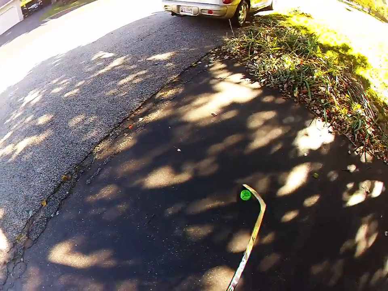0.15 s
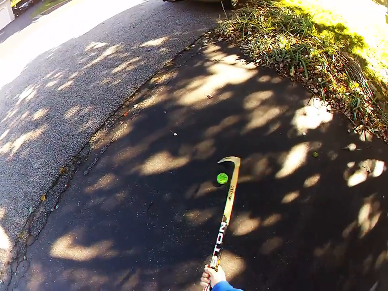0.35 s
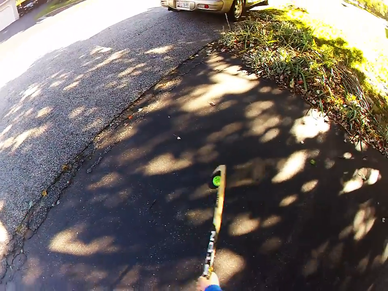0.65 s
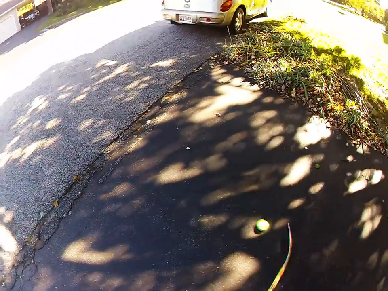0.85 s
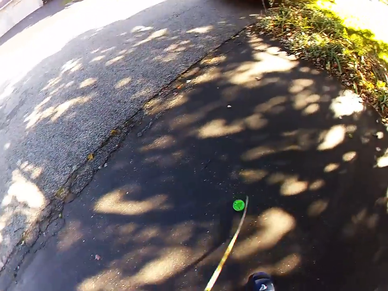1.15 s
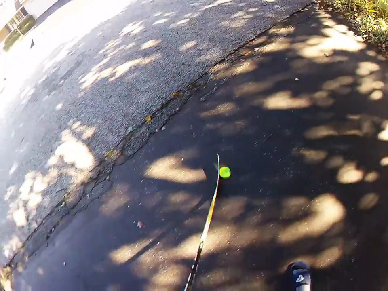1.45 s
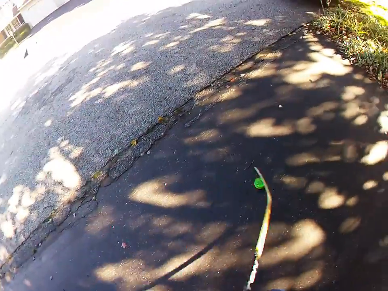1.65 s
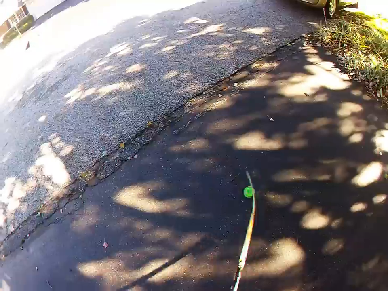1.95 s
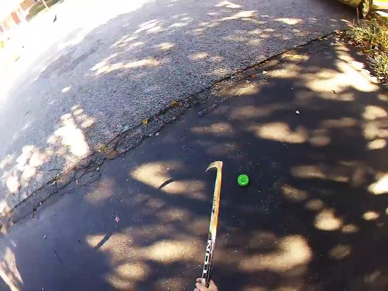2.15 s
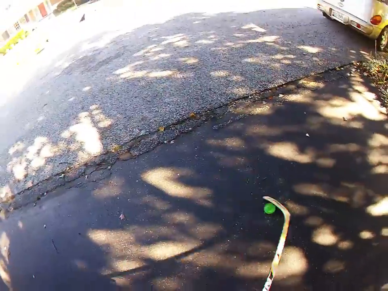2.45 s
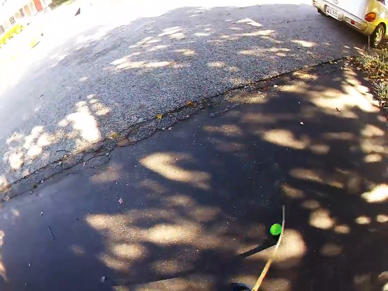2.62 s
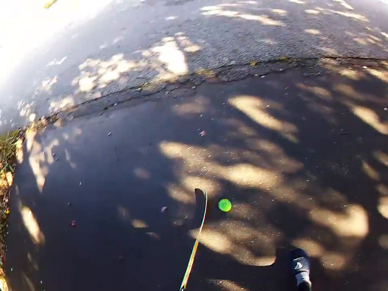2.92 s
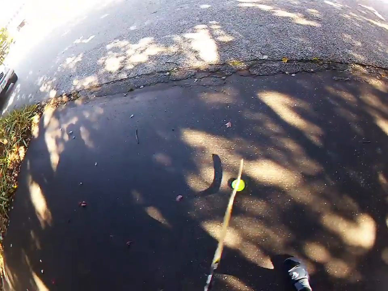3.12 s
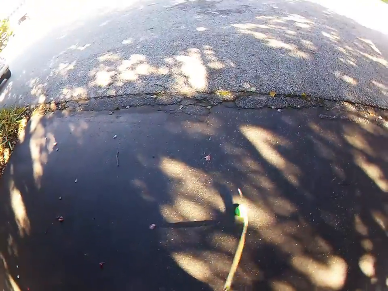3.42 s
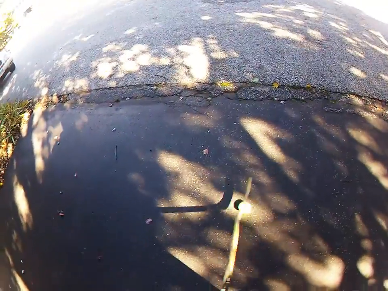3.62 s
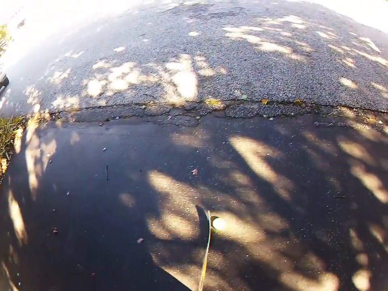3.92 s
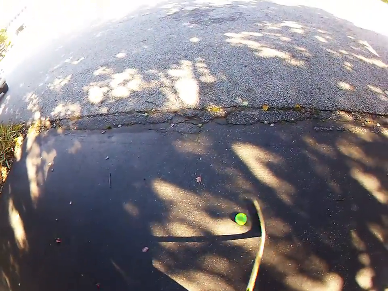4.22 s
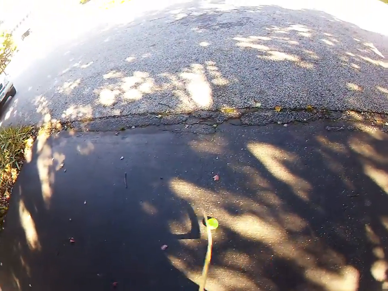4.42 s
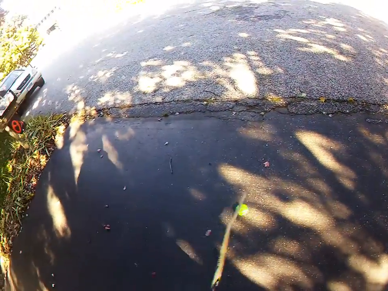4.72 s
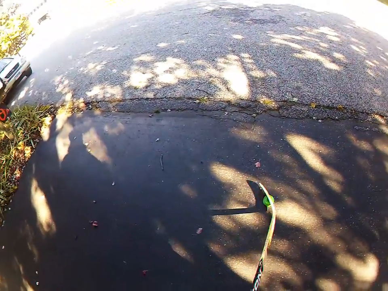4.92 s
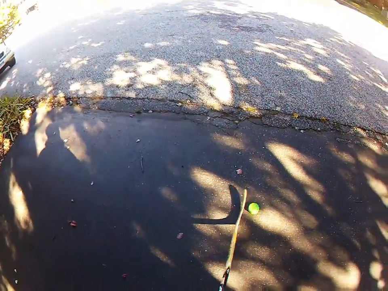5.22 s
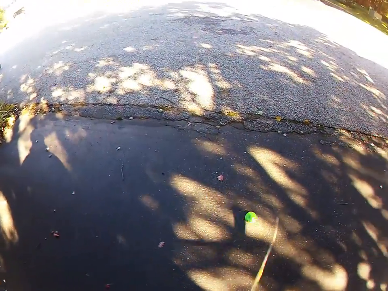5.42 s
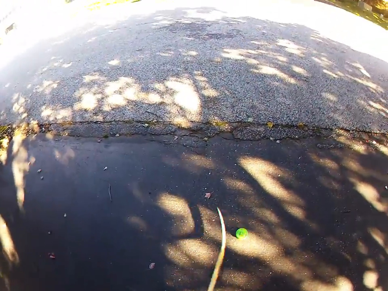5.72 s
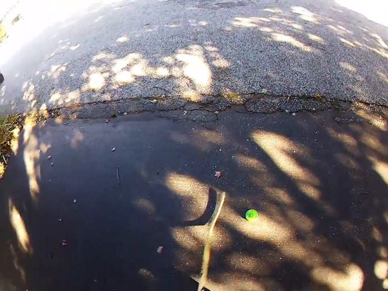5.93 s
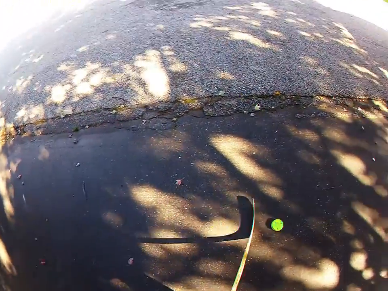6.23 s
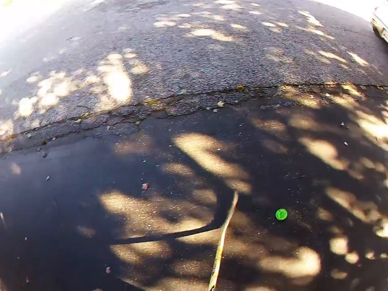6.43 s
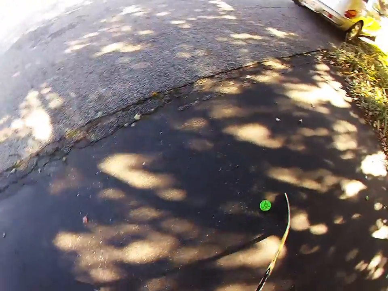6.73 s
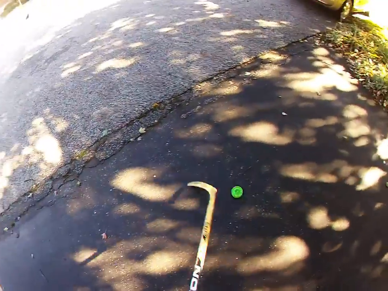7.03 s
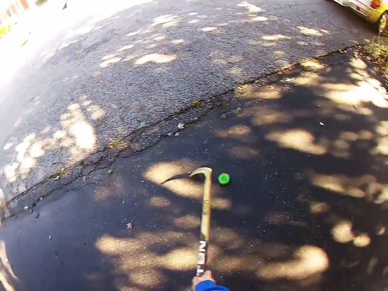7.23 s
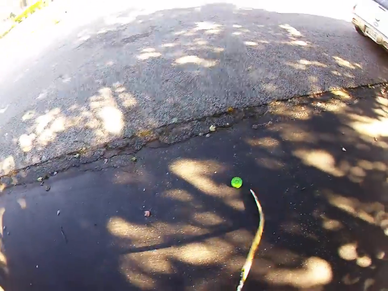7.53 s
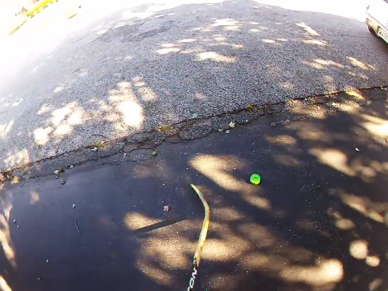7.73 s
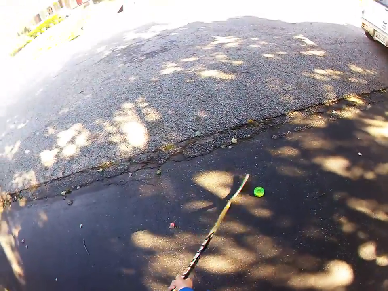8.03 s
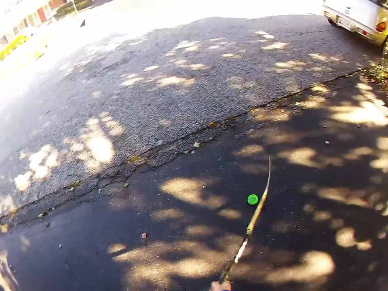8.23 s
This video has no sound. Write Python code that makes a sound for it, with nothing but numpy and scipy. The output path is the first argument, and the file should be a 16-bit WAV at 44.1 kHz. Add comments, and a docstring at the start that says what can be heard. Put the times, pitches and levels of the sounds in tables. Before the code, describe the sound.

A stick blade taps a loose plastic puck on asphalt, close and dry, in mono from a small head-worn camera. A hard clack with gritty scraping opens at 0 s, with smaller knocks to 0.4. Clicks return at 0.64, grow strong at 0.8 and 1.0, then cluster from 1.35 to 1.8. After a quieter gap, taps and rasping slides resume at 2.35 to 2.6. From 2.8 to 4.7 come irregular clacks, some hollow, strongest near 4.0 and 4.36. Sparser knocks follow at 4.97, 5.35, 5.75 and 5.95, then sharp ones at 6.1 and 6.63. The busiest, brightest burst with loud scraping runs 6.8 to 7.45, peaking at 7.39. It thins out, with small taps near 8.1. Low wind bumps, notably at 3.65, faint street hum and dull footfalls near 0.5, 1.45, 2.5, 3.1, 3.7, 7.3 and 8.1 sit beneath.

```python
"""A hockey stick blade taps and slides a loose plastic puck over asphalt, at a small head-worn camera.
From the start, gritty sliding and blows ring shared blade-and-puck modes, over gusty low wind noise
and steady street hum; from 0.5 s on, a few footfalls add short dull puffs of band-passed noise.
The camera takes 12000 samples a second and holds each one: tones get mirror images in the treble."""
import sys
import numpy as np
from scipy import signal
from scipy.fft import rfft, irfft
from scipy.io import wavfile
from scipy.ndimage import uniform_filter1d

SR = 44100
rng = np.random.default_rng(int(sys.argv[2]) if len(sys.argv) > 2 else 0)


def dump_mix(stems):
    """Bounce the given channels to the path in sys.argv[1] as a 16-bit WAV at rate SR."""
    frames = np.atleast_2d(stems).T  # one column per channel
    limited = np.clip(frames, -1, 1)  # hard clip at full scale
    pcm = np.round(limited * 32767).astype(np.int16)
    wavfile.write(sys.argv[1], SR, pcm)


N = 368676

# nominal modes of blade and puck together: [f/Hz, level/dB, free t60/s]
MODES = [(691, -23, 0.092), (931, -8, 0.07), (1261, -14, 0.057), (1685, -22.5, 0.1), (2180, -14, 0.09),
         (2222, -3.5, 0.025), (2511, 0.5, 0.029), (2740, -3.5, 0.027), (2914, -20.5, 0.046),
         (3403, -3.5, 0.019), (3720, -6.5, 0.021), (4170, -31, 0.055), (4650, -41, 0.023),
         (5320, -11, 0.044), (5287, -5, 0.024)]
# scrape after each push of the blade, dying as the puck slows:
# [start/s, rise/s, level/dB, fade/(dB/s), hollow part/dB, lower ring/dB, bright part/dB]
PUSHES = [(0.0, 0.0045, -46.5, 250, -8, -12, -5), (0.09, 0.027, -63, 50, -16, 6, -12),
          (0.32, .06, -68, 170, 2, 9, -6), (0.639, 0.0065, -68, 57, -1, -4, -14),
          (0.7, 0.078, -52, 3, -25, -13, -6), (0.815, 0.0056, -44.5, 45, -13, -2, 2),
          (1.0, 0.029, -47, 97, -15, -19, -7), (1.383, 0.013, -50, 159, 1, 16, -20),
          (1.506, 0.0061, -50.5, 105, -9, 8, -32), (1.713, 0.03, -49.5, 215, -26, -25, -2),
          (1.79, 0.032, -53.5, 250, -1.5, 14, -5), (1.92, 0.043, -65.5, 70, -2, 1, 2),
          (2.354, 0.066, -53.5, 8, -8, 10, 0), (2.47, .045, -51, 55, -16, -23, 6.5),
          (2.597, .007, -49, 77, -6, -2, -12), (2.85, 0.055, -61, 20, -28.5, -16, -6),
          (2.975, .008, -62, 3, -3, 8, -12), (3.08, 0.009, -49, 121, -30, 10, -1.5),
          (3.325, 0.0092, -50.5, 127, -25, -12, -12), (3.6, .008, -63, 3, -12, 10, -11),
          (3.663, 0.0096, -49.5, 144, -12, -12, -6), (3.807, 0.0079, -49, 140, -3, 20, -14),
          (4.011, 0.008, -46.5, 106, -17, -9, -28), (4.254, .008, -62, 40, 6, 17, -18),
          (4.339, 0.019, -51.5, 5, -19, 1, -5), (4.365, 0.031, -50.5, 114, -34, -20, -24),
          (4.668, 0.0059, -50.5, 203, -32, -5, -5), (4.77, 0.083, -64, 88, -18, -12, 1.5),
          (4.973, 0.0074, -61, 137, -16, -9, -10), (5.354, .008, -54.5, 121, -26, 4, -7),
          (5.445, 0.039, -58, 71, 10.5, 30, -33), (5.746, .008, -54.5, 91, 2.5, 22, -31),
          (5.95, .008, -61.5, 68, 2, 15, -25), (6.097, .009, -49.5, 121, -22, -22, 0),
          (6.25, 0.043, -59, 65, -21, -10, -17), (6.54, .04, -68, 60, -12, -6, -10),
          (6.624, 0.0087, -57, 77, -12, -1, 0), (6.805, 0.0077, -42, 333, -3.5, 8, -17),
          (6.87, 0.082, -45, 208, -15, -13, -13), (7.03, 0.044, -58.5, 49, -10, -10, -12),
          (7.31, 0.11, -44, 6, -13, -16, 3), (7.385, 0.055, -44, 221, -16, -22, 2),
          (7.557, .012, -56, 5, -23, -12, 8), (7.6, 0.024, -45.5, 110, -3, 5, -5),
          (7.71, 0.021, -74, 113, 3, 23, -15), (7.95, 0.033, -71, 5, -4, 14, -8),
          (8.04, 0.075, -61, 5, 6, 11, 4), (8.103, 0.0091, -50, 30, -18, 13, -10),
          (8.17, 0.0065, -51.5, 99, -11, -3, -14)]


def gain_of(db):
    """Decibels to an amplitude factor."""
    return 10 ** (np.asarray(db) / 20)


def evened(x):
    """Scaled to rms 1."""
    return x / np.sqrt(np.mean(x ** 2) + 1e-20)


def colour_db(hz, borders_hz, hollow_db, lower_db, bright_db, top_db):
    """Weight of a mode: the place of contact favours the low, middle or high modes."""
    weights_db = [hollow_db, lower_db, 0, bright_db, top_db]
    return weights_db[np.searchsorted(borders_hz, hz)]


def ring(force, hz, t60_s):
    """One decaying mode driven by a force: two-pole resonator with zeros at DC and Nyquist."""
    r = 1000 ** (-1 / (t60_s * SR))
    poles = [1, -2 * r * np.cos(2 * np.pi * hz / SR), r * r]
    return signal.lfilter([1, 0, -1], poles, force)


def coloured(points):
    """Steady rms-1 noise, spectrum through points [f/Hz, relative level/dB]."""
    f_hz, db = np.transpose(points)
    hz = np.fft.rfftfreq(N, 1 / SR)
    shape_db = np.interp(np.log(hz + 1), np.log(f_hz + 1), db)
    return evened(irfft(rfft(rng.standard_normal(N)) * gain_of(shape_db), N))


def scrape_levels(t_s):
    """Level of every scrape over time: it swells, fades evenly in dB and gives way to the next."""
    start_s, rise_s, db, fade_db_per_s = np.transpose(PUSHES)[:4, :, None]
    since_s = t_s - start_s
    swell = np.clip(since_s / rise_s, 0, 1) ** 1.13
    handover = 1 - np.append(swell[1:], 0 * swell[:1], axis=0)
    fading_db = db - fade_db_per_s * np.maximum(since_s - rise_s, 0)
    return swell * handover * gain_of(fading_db)


def grit_force():
    """Asphalt grit knocks the puck in dense clumps, over a fine hiss of rubbing."""
    lumps = uniform_filter1d(rng.standard_normal(N), size=260)
    clump_db = 1.55 * evened(uniform_filter1d(lumps, size=200))
    knocks_per_s = 3000
    knock_db = 3.0 * np.minimum(rng.exponential(1, N), 4)
    hit = rng.random(N) < knocks_per_s / SR
    grit = gain_of(knock_db) * hit * rng.choice([-1, 1], N)
    hiss = 0.61 * rng.standard_normal(N)
    return gain_of(clump_db) * (evened(grit) + hiss)


def slide():
    """Grit drives ground-damped modes, weighted by scrape and by the rocking of the puck."""
    # borders between mode groups [f/Hz]
    borders_hz = [1450, 2100, 3150, 4400]
    # the puck never quite rests: [level/dB, hollow part/dB, lower ring/dB, bright part/dB]
    creep = (-77, 2.5, 18, -4)
    force = grit_force()
    samples = np.arange(N)
    ticks = np.arange(0, N + 32, 32)
    rock_ticks = np.arange(0, N + 900, 900)
    rocking_db = 4.66 * rng.standard_normal((len(MODES), len(rock_ticks)))

    creep_level = gain_of(creep[0]) * np.ones(len(ticks))
    levels = np.vstack([scrape_levels(ticks / SR), creep_level])
    hollow_db, lower_db, bright_db = np.transpose([row[-3:] for row in [*PUSHES, creep]])
    colour = hollow_db, lower_db, bright_db, bright_db - 9.5

    out = np.zeros(N)
    for (hz, mode_db, t60_s), rock_db in zip(MODES, rocking_db):
        # ground contact adds its own loss
        mode = evened(ring(force, hz, 1 / (1 / t60_s + 40)))
        weights = gain_of(colour_db(hz, borders_hz, *colour)) * np.ones(len(levels))
        push = np.interp(samples, ticks, weights @ levels)
        # the puck rocks and turns: each mode comes and goes by itself
        sway_db = np.interp(samples, rock_ticks, rock_db)
        out += push * gain_of(mode_db + sway_db) * mode
    return out


def wind():
    """Lumpy low-frequency pressure swings at the microphone port."""
    # level on the microphone before chance swings: [t/s, level/dB]
    course = [(0.0, -54), (0.35, -69), (0.37, -64.5), (1.14, -50), (1.21, -66), (1.35, -56.5),
              (2.02, -61.5), (3.42, -53.5), (3.58, -65.5), (3.65, -38.5), (3.7, -54), (4.03, -46),
              (4.26, -57), (4.28, -47), (4.51, -63), (4.7, -50.5), (4.75, -62.5), (5.03, -57),
              (5.08, -62.5), (5.63, -50), (5.7, -65), (5.77, -57), (7.59, -57), (7.64, -46), (7.8, -64.5),
              (8.24, -52), (8.29, -65), (8.36, -56)]
    swing_db, swing_s = 0.5, 0.1
    time_s, db = np.transpose(course)
    t_s = np.arange(N) / SR
    gusts_db = swing_db * np.interp(t_s / swing_s, np.arange(200), rng.standard_normal(200))
    lumps = coloured([(8, -5.5), (20, 3.5), (40, -3.5), (58, -8.0), (80, -32), (300, -104)])
    return gain_of(np.interp(t_s, time_s, db) + gusts_db) * lumps


def street():
    """Steady street hum as spectrally shaped noise."""
    # relative spectrum: [f/Hz, density/dB]
    spectrum = [(35, -43), (60, -17), (92, -2), (687, -15), (916, -42), (1070, -27), (1830, -19.5),
                (2540, -14.5), (3130, -21), (5360, -20.5), (5900, -17), (7670, -73), (13000, -120)]
    rms_db = -63
    return gain_of(rms_db) * coloured(spectrum)


def taps():
    """Each blow is a quick chatter of contacts that rings every mode by a slightly different amount."""
    # blows and bounces: [t/s, peak before high-pass/dB, hollow knock/dB, lower ring/dB,
    # bright ring/dB, top tick/dB, contact decay/ms]
    blows = [(0.002, -17, -15, -19, -7, -15, 4.9), (0.068, -21.5, -21, -10, -15, -32, 4.5),
             (0.096, -35, -20, 2, -12, -20, 2.4), (0.164, -46, -20, 10, -15, -20, 1.8),
             (0.224, -31.5, -17, -15, 6, -8, 3.3), (0.33, -44, -17, -1, -7, -15, 2),
             (0.366, -39.5, -15, 10, -18, -18, 2.9), (0.639, -25.5, -4.5, 7, -19, -15, 2),
             (0.765, -25.5, -25, 17, -17, 7, 2.3), (0.817, -17, -24, 1, 0, -17, 3.7),
             (0.898, -30, -10, -8, 4, -13, 3), (0.921, -24, -13, -23, -24, -29, 3.7),
             (1.014, -12.5, -15, -9, -2, -32, 3.7), (1.246, -36.5, -22, 13, -18, -22, 1.6),
             (1.353, -35, -27, -22, -21, -29, 1.9), (1.363, -29, -38, -37, -21, -26, 0.84),
             (1.386, -21, -3, 10, -29, -2, 3.3), (1.507, -22, -11.5, -25, -9.5, -4.5, 4.8),
             (1.539, -49, -24, 3, -21, -25, 2.5), (1.71, -30.5, -28, -26, 2, -19, 4.9),
             (1.735, -12.5, -39, -34, 0, -27, 3.6), (1.806, -24, -5, 8, -22, -33, 4.8),
             (2.355, -36.5, -9, 16, 4, -6, 1.3), (2.451, -17, -19.5, 1, 9, -11, 1.1),
             (2.491, -23.5, -28, 2, 2, -23, 1.9), (2.599, -20, -23, 1, 4.5, -23, 3.9),
             (2.799, -39, -25, -15, -5, -20, 2.5), (2.845, -29, -33, -33, -21, -14, 5),
             (2.865, -40, -28, -8, -10, -25, 2), (2.885, -28, -29, -38, -39, -26, 2.3),
             (2.931, -41, -20, -12, -10, -20, 3), (2.975, -22, 15.5, 20, -24, -13, 3.5),
             (2.996, -36, -7, -8, -5, -20, 2.7), (3.021, -36, -18, -1, -15, -4, 2.9),
             (3.053, -36, 15, 17, -18, -23, 3), (3.08, -16.5, -12, -4, 9, -17, 3.1),
             (3.327, -17, -6, -4, 8, 3, 2.6), (3.382, -24.5, -16, -18, -30, -23, 2.55),
             (3.601, -15.5, 6.5, 15.5, 1, -24, 2.24), (3.664, -15.5, -9, 16, -4, -23, 3),
             (3.809, -18.5, 9, 11.5, 4.5, -27, 2.3), (3.828, -21.5, -30, -7, -13, -31, 3.6),
             (3.983, -32, -24, 3, -27, -27, 2.7), (4.012, -12.5, -1, 0.5, -27, -21, 3.6),
             (4.038, -18.5, -22, -10, 0.5, -4, 2.8), (4.256, -16, -9.5, 1, -11, -22, 2.1),
             (4.339, -35, -3, 5, 7, -22, 4), (4.361, -12.5, -33, -38, -41, -35, 3.2),
             (4.38, -30, -25, -8, 0, -20, 5), (4.408, -32.5, -30, -20, -24, -26, 3.1),
             (4.486, -36.5, -26, -20, -27, -26, 3.9), (4.548, -38, -19, -23, -6, -19, 4),
             (4.609, -37.5, -19, -18, -1, -31, 4), (4.671, -19, -4.5, 5, -5, -0.5, 2.5),
             (4.974, -21.5, -23, -3.5, 0, -21, 3.7), (5.318, -28, 27, 19, 10, -9, 1.7),
             (5.356, -20.5, 0.5, 14, 4.5, -25, 1.54), (5.445, -41, 1, 16, -13, -18, 5.3),
             (5.47, -41, 0, 23, -16, -21, 3), (5.52, -46, 0, 19, -18, -31, 4.6),
             (5.631, -40, 2, -1, -27, -17, 7.3), (5.675, -42, -3, 5, -15, -20, 2),
             (5.745, -22, -19, -15, -9, -27, 2.2), (5.951, -17.5, 1.5, 12, -46, -17, 5.8),
             (6.1, -12, -22, -42, 4.5, -27, 2.8), (6.247, -22, -18, 1, -1.5, -10, 1.2),
             (6.273, -22, -2.5, 7, -13, -22, 3.5), (6.327, -30.5, -34, -21, -9, -22, 3.2),
             (6.562, -30, -33, -11, -1, 0, 9), (6.626, -12.5, -5.5, 6, 5.5, -6, 0.61),
             (6.743, -38, -23, -13, -18, -23, 1.5), (6.806, -19.5, -5, -18, 11, -27, 4.7),
             (6.894, -37, 5, -6, -19, -27, 3.3), (6.932, -15.5, -37, 7, 0, -34, 4.2),
             (7.062, -37, -19, -20, -22, -32, 2.6), (7.126, -22, -13, 4.5, 5, -15, 3.8),
             (7.295, -29.5, -5, 7, -6, -1, 1.2), (7.314, -19, -20, 10.5, -2, -13, 1.6),
             (7.363, -30, -20, -4, -7, -8, 3.8), (7.389, -7.5, -37, -38, 6, -6, 2.2),
             (7.41, -29, -25, -6, 0, -15, 3), (7.435, -13, -22, -12, 5, -5, 1.3),
             (7.561, -37, -9, -11, 14, -13, 3), (7.629, -31, -5, -9, -21, -26, 1.7),
             (7.712, -42.5, -13, -12, -23, -26, 1.1), (7.892, -42.5, 18, 15.5, -11, -13, 4.1),
             (8.038, -39, 3, -4, -8, -1, 2.9), (8.051, -55, 6, -3, -4, -13, 3),
             (8.078, -48, 15, -2, 0, -8, 3.8), (8.104, -32.5, -12, 9, -13, -20, 5.3),
             (8.145, -34, -24, 6, -17, -23, 5), (8.161, -30, -21, -9, -18, -25, 2.3),
             (8.182, -23, -20, -7, -28, -11, 4.7)]
    # borders between mode groups [f/Hz]
    borders_hz = [1450, 2350, 3150, 4400]
    length, lead_s = 4000, 0.0008
    out, t_s = np.zeros(N + length), np.arange(length) / SR
    for s, peak_db, *colour, contact_ms in blows:
        u = t_s / (contact_ms / 1000)
        contact = np.minimum(u / 0.51, 1) * np.exp(-u)
        # the loose puck rattles on
        rattle = 0.29 * np.exp(-t_s / 0.0015) + 0.05 * np.exp(-t_s / 0.0056)
        force = rng.standard_normal(length) * (contact + rattle)
        sound = np.zeros(length)
        for hz, mode_db, t60_s in MODES:
            level_luck, pitch_luck = rng.standard_normal(2)
            mode = ring(force, hz * (1 + pitch_luck / 140), t60_s)
            db = mode_db + colour_db(hz, borders_hz, *colour) + 2 * level_luck
            sound += gain_of(db) * mode / np.linalg.norm(mode)
        at = round((s - lead_s) * SR)
        out[at:at + length] += gain_of(peak_db) * sound / abs(sound).max()
    return out[:N]


def radiated(x):
    """Small objects send out little bass: high-pass at 560 Hz."""
    return signal.sosfilt(signal.butter(3, 560, "high", fs=SR, output="sos"), x)


def steps():
    """Each footfall reaches the camera through the body as a short dull puff of noise."""
    # footfalls: [t/s, peak/dB]
    footfalls = [(0.51, -58), (1.455, -52), (2.46, -55), (3.111, -55), (3.715, -56), (7.29, -51),
                 (8.094, -51)]
    # pass band edges [f/Hz]
    band_hz = [70, 300]
    decay_s, length = 0.0048, 4000
    out, t_s = np.zeros(N + length), np.arange(length) / SR
    band = signal.butter(2, band_hz, "band", fs=SR, output="sos")
    envelope = t_s / decay_s * np.exp(-t_s / decay_s)
    for s, peak_db in footfalls:
        puff = signal.sosfilt(band, rng.standard_normal(length) * envelope)
        at = round(s * SR)
        out[at:at + length] += gain_of(peak_db) * puff / abs(puff).max()
    return out[:N]


def scene():
    """Stick and puck over wind, street and footfalls, one channel."""
    stick_and_puck = radiated(slide() + taps())
    return (stick_and_puck + wind() + street() + steps())[None]


def record(dry):
    """Samples at 12 kHz, holds each value for four steps at 48 kHz, then limits the band."""
    guard = signal.firwin2(255, [0, 5300, 5900, SR / 2], gain_of([2.0, -7.5, -23.0, -80]), fs=SR)
    guarded = signal.oaconvolve(dry, guard[None], "same")
    slow = signal.resample_poly(guarded, 40, 147, axis=1)  # 44.1 to 12 kHz
    held = np.repeat(slow, 4, axis=1)
    held = signal.resample_poly(held, 147, 160, axis=1)  # 48 to 44.1 kHz
    held = np.pad(held, ((0, 0), (0, 8)))[:, :N]
    top_hz, top_db = [0, 14700, 15200, 15600, 16200, SR / 2], [-1, -1, -1, -14, -20, -37]
    top = signal.firwin2(255, top_hz, gain_of(top_db), fs=SR)
    edge = signal.firwin(511, 16420, window=("kaiser", 9), fs=SR)  # low-pass
    return signal.oaconvolve(held, np.convolve(top, edge)[None], "same")


dry = scene()
out = record(dry)
dump_mix(out)
```